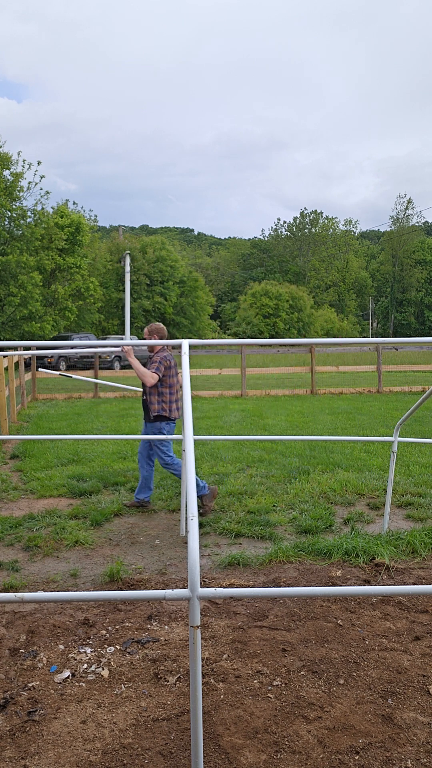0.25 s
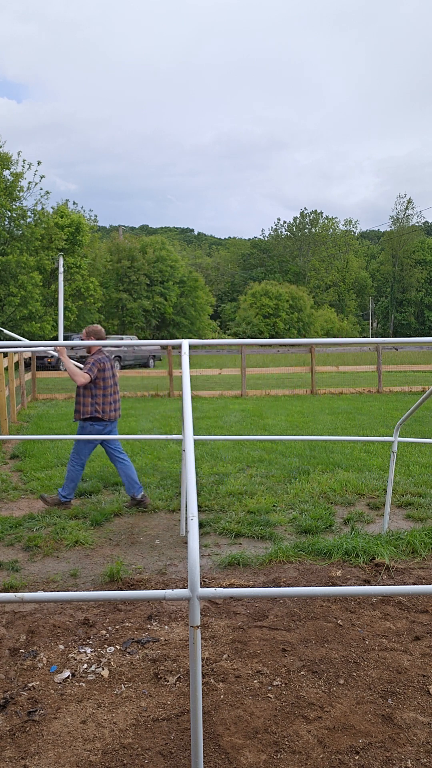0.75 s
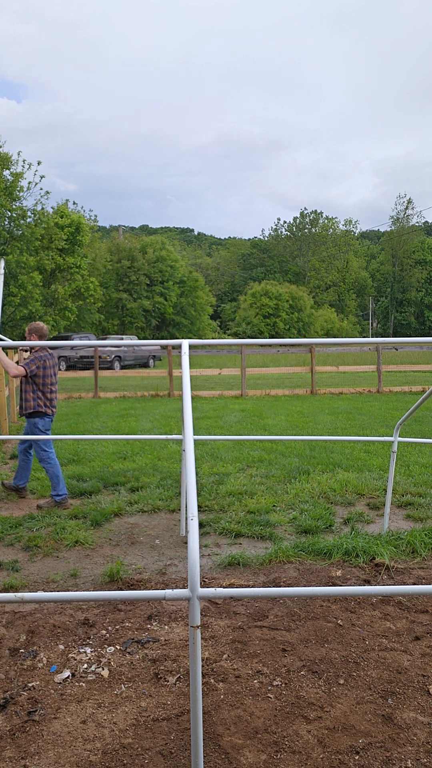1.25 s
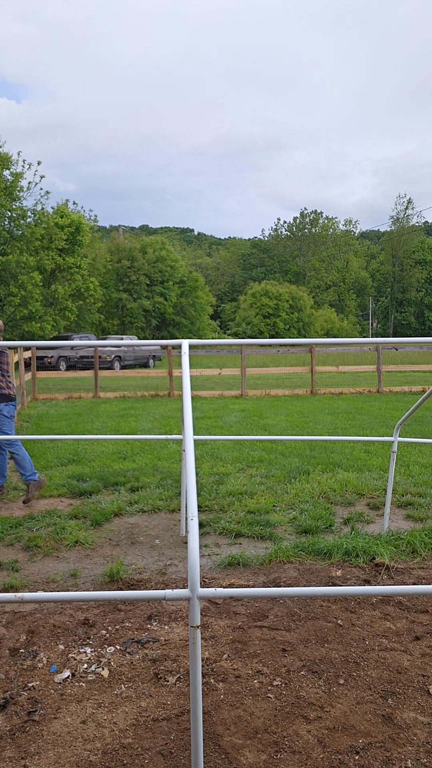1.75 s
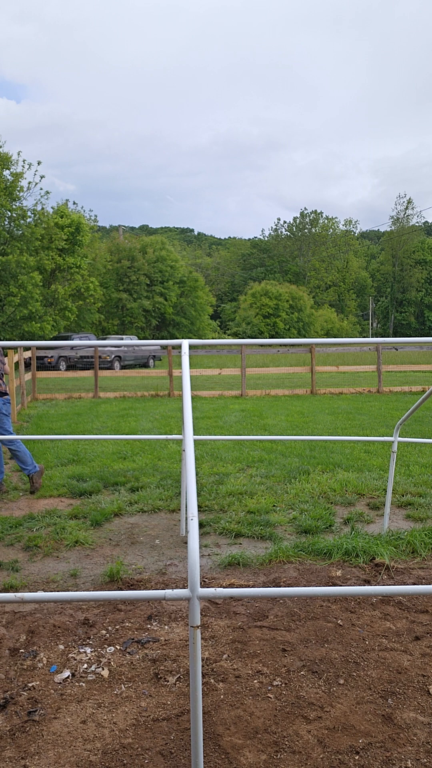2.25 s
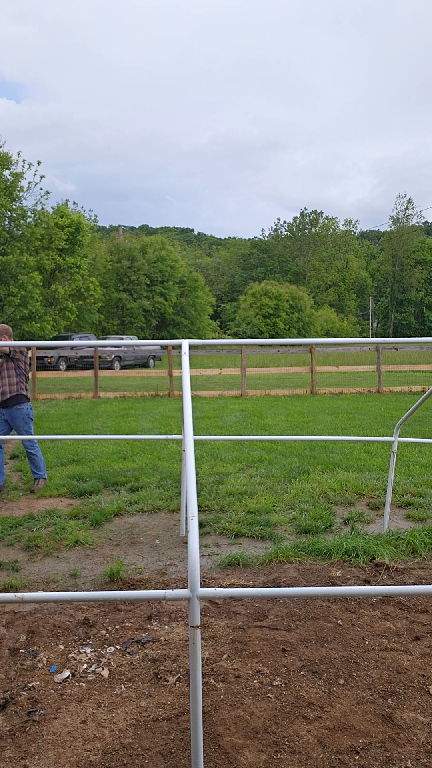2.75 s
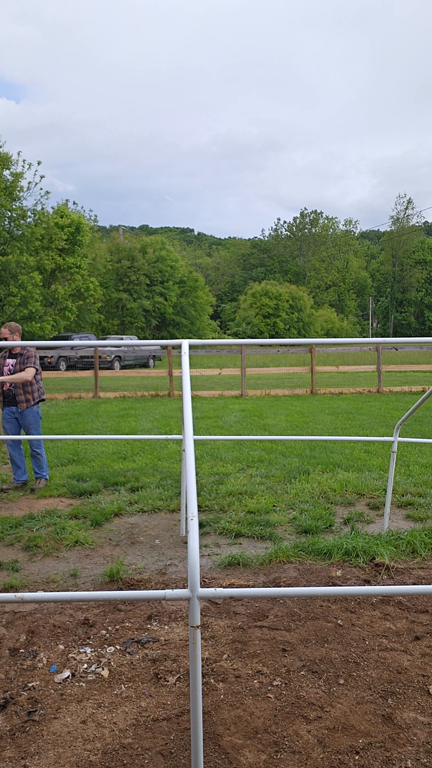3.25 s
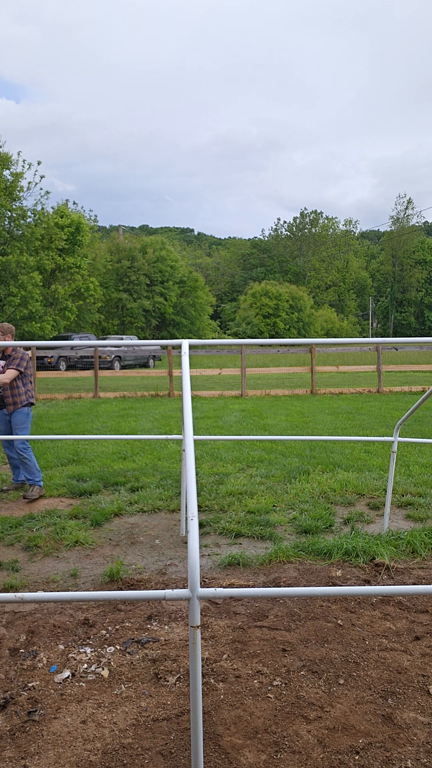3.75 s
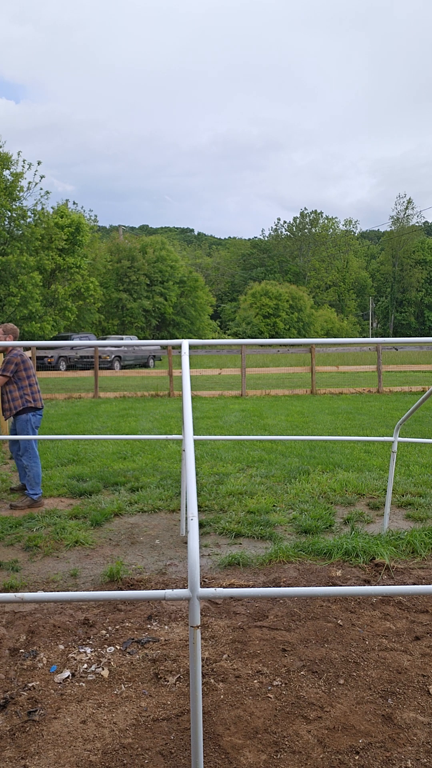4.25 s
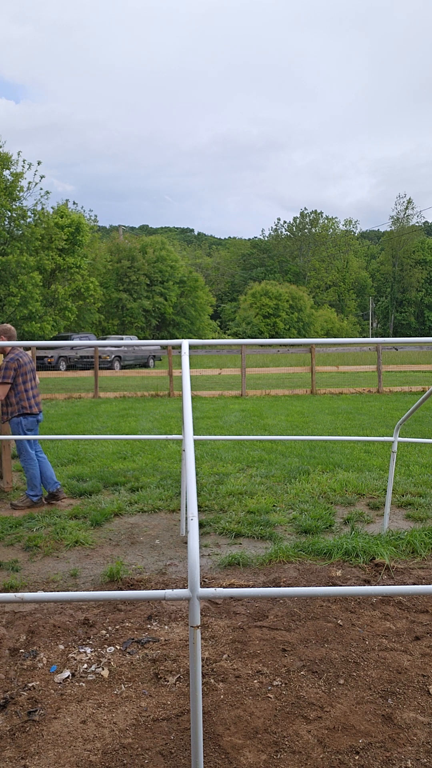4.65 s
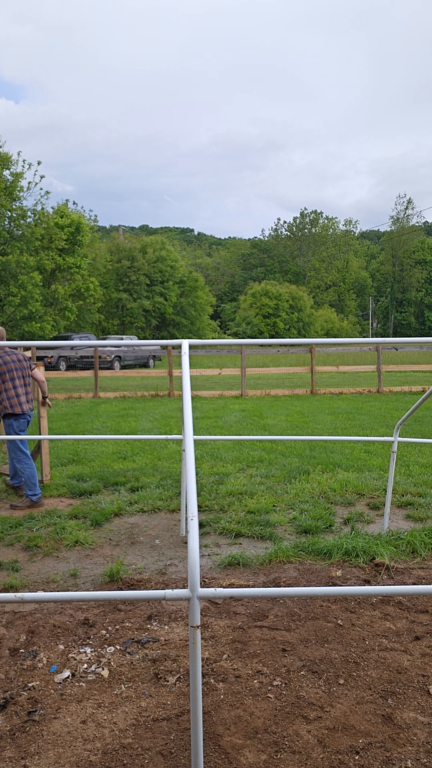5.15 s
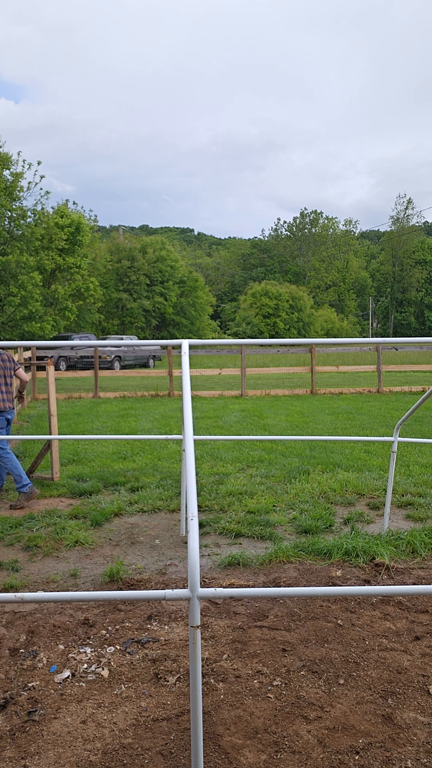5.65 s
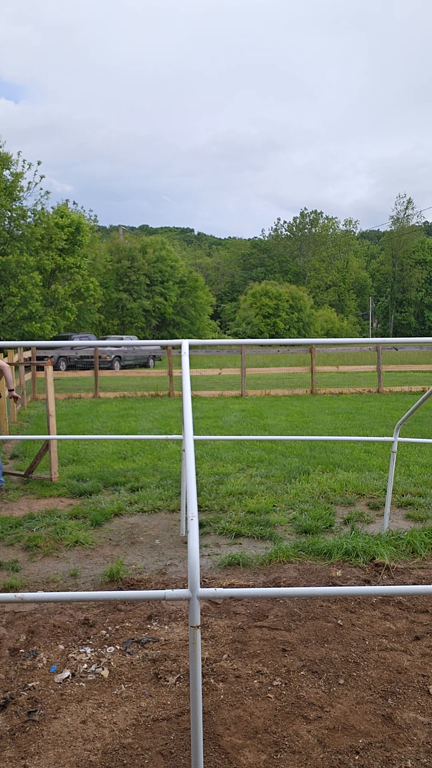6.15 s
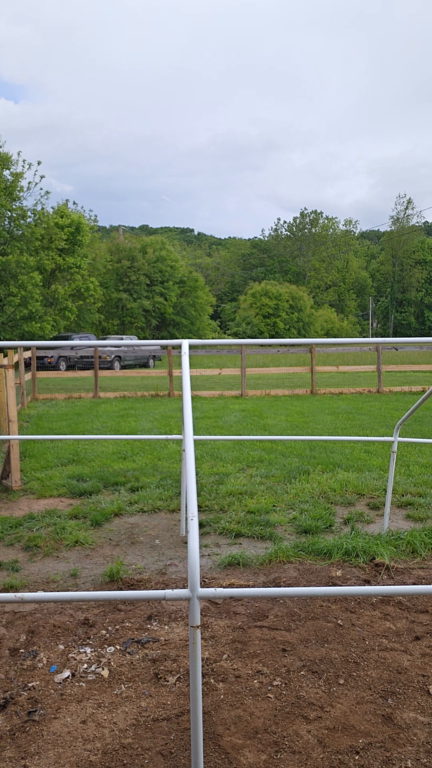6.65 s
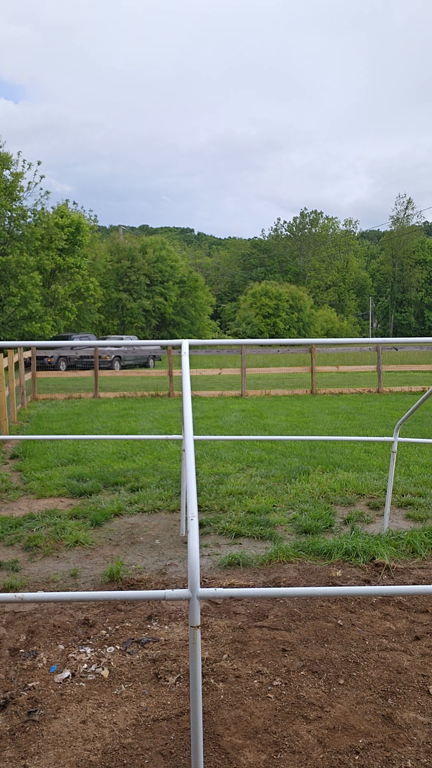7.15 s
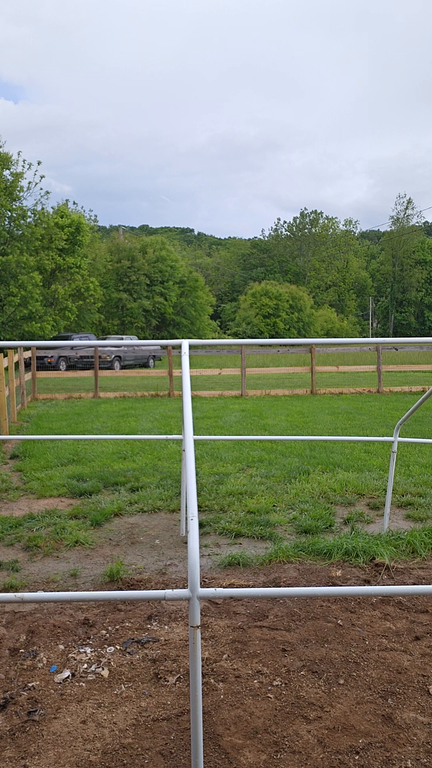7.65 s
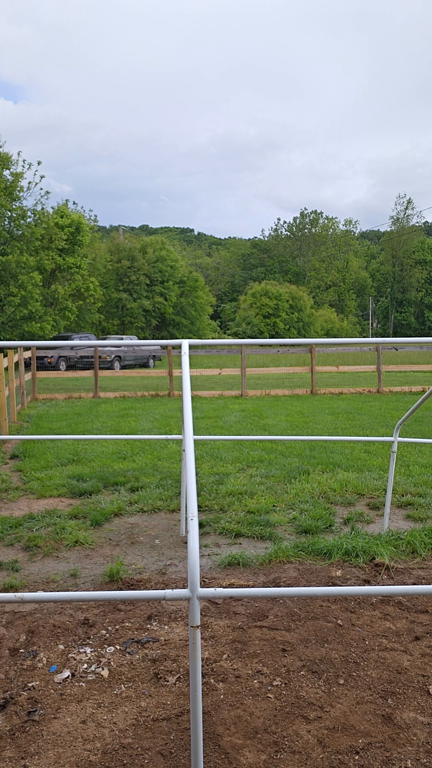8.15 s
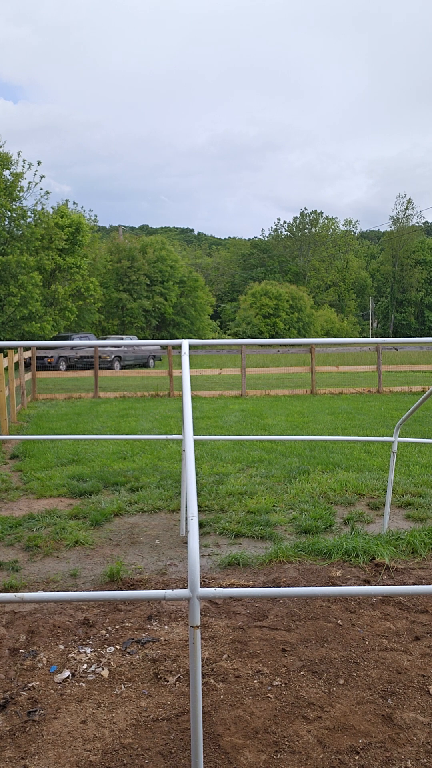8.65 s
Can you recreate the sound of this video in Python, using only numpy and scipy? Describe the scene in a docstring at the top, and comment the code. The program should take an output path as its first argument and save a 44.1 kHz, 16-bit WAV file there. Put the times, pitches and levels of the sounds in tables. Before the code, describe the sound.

Metal poles clank and clatter onto a pile in a quiet yard, then a wooden stand knocks hard against metal with a low boom.

```python
"""Tent poles and a wooden stand in a yard

A man carries metal tent poles across a grassy yard and drops them on a pile, where they clatter and settle;
he then shifts a wooden stand and knocks it down against the metal, which clinks and booms like a large panel.
Blows are shaped noise plus decaying sines, the boom is wobbling low sines, and scuffs are grainy noise.
Behind: air as drifting noise, a distant motor as narrow noise lines, a faint bird as gliding sines with echo."""
import sys
import numpy as np
from scipy import signal
from scipy.fft import rfft, irfft, next_fast_len
from scipy.io import wavfile
from scipy.ndimage import uniform_filter1d

SR = 44100
rng = np.random.default_rng(int(sys.argv[2]) if len(sys.argv) > 2 else 0)


def transcribe(u):
    """Save the signal u as a 16-bit wav file named by the first command-line argument.

    u: samples, shape (n,) or (channels, n), limited to [-1, 1]; the rate is SR.
    q: integer samples, one column per channel.
    """
    v = np.clip(np.atleast_2d(u).T, -1, 1)
    q = np.round(v * 32767).astype(np.int16)
    wavfile.write(sys.argv[1], SR, q)


N = 392798


def amp(db):
    """Decibels to gain."""
    return 10 ** (np.asarray(db) / 20)


def evened(x):
    """Scales to rms 1."""
    return x / np.sqrt(np.mean(x ** 2) + 1e-20)


def read(points, hz):
    """Reads a spectrum on a log-frequency axis."""
    f, value = np.transpose(points)
    return np.interp(np.log(hz + 1), np.log(f + 1), value)


def swell(points):
    """A level curve as a gain for every sample."""
    return amp(np.interp(np.arange(N) / SR, *np.transpose(points)))


def add(mix, s, sound):
    """Adds a stereo sound at time s."""
    part = mix[:, max(round(s * SR), 0):][:, :sound.shape[1]]
    part += sound[:, :part.shape[1]]


def envelope(t, rise, t60):
    """A straight rise, then an exponential decay."""
    return np.minimum(t / rise, 1) * amp(-60 * np.maximum(t - rise, 0) / t60)


def pair(z, likeness):
    """Makes two unrelated spectra partly alike, as left and right."""
    c = np.clip(likeness, -1, 1)
    return np.array([z[0], c * z[0] + np.sqrt(1 - c ** 2) * z[1]])


# Relative colour of the air. Each row: frequency in Hz, level in dB per Hz.
AIR_COLOUR = [(20, -27), (43, -9.5), (81, -5.5), (110, -1), (142, -12), (204, -11), (280, -16.5),
              (540, -20), (1330, -16), (1760, -19.5), (2750, -19.5), (3400, -25.5), (4900, -26),
              (5900, -33), (9000, -34.5), (13900, -32), (16000, -42)]
# Slow level of the air. Each row: time in seconds, gain in dB.
AIR_LEVEL = [(0, -0.5), (2.1, -1), (3, -5.5), (4.1, 0), (5, -1.5), (8.9, -0.74)]
# How alike left and right are. Each row: frequency in Hz, likeness (1 = the same).
AIR_LIKENESS = [(60, 0.86), (130, 0.98), (290, 0.98), (640, 0.79), (1300, 0.44), (2200, 0.12),
                (4000, 0.056), (15000, 0.083)]
AIR_DB = -48  # rms before the swell


def air(patch_db=1.84, flicker_db=2.0, lead_s=0.00028):
    """Far traffic and leaves: noise with drifting patches and a treble that flickers."""
    frames, hz = N // 256 + 5, np.fft.rfftfreq(1024, 1 / SR)
    a, b, c, d, patches = rng.standard_normal((5, frames, len(hz)))
    patches = uniform_filter1d(patches, size=14, axis=0)  # smooth in time
    patches = evened(uniform_filter1d(patches, size=12, axis=1))  # smooth in frequency
    flicker = evened(uniform_filter1d(rng.standard_normal(frames), size=5))
    treble_flicker = flicker[:, None] * hz / (hz + 4000)
    tone_db = read(AIR_COLOUR, hz) + patch_db * patches + flicker_db * treble_flicker
    spectra = pair([a + 1j * b, c + 1j * d], read(AIR_LIKENESS, hz)) * amp(tone_db)
    spectra[0] *= np.exp(2j * np.pi * hz * lead_s)  # the far sound reaches the left side first
    noise = signal.istft(spectra.swapaxes(1, 2), nperseg=1024, noverlap=768)[1][:, :N]
    noise = signal.sosfilt(signal.butter(2, 42, "high", fs=SR, output="sos"), noise)
    return amp(AIR_DB) * evened(noise) * swell(AIR_LEVEL)


# Low motor lines. Each row: centre in Hz, width in Hz, level in dB before the swell.
DRONE_LINES = [(56.3, 3.1, -61), (111.6, 16.6, -55.5), (116.6, 5.3, -61.5)]
# Slow level of the motor. Each row: time in seconds, gain in dB.
DRONE_LEVEL = [(0, 6), (.7, -1.5), (3, -2.5), (4.3, 4), (6, -2.5), (8.9, -2)]


def drone():
    """A distant motor: noise narrowed to low lines, which waver by themselves."""
    size = next_fast_len(N, True)
    hz = np.fft.rfftfreq(size, 1 / SR)
    lines = np.zeros(size)
    for centre_hz, width_hz, db in DRONE_LINES:
        resonance = 1 / (1 + (2 * (hz - centre_hz) / width_hz) ** 2)
        lines += amp(db) * evened(irfft(rfft(rng.standard_normal(size)) * resonance, size))
    return lines[:N] * swell(DRONE_LEVEL)


# Bird notes, slurred down from the top pitch or lifted slightly up to it.
# Each row: start in seconds, top pitch in Hz before waver, level in dB before the direct and echo gains,
# direction (+1 up, -1 down).
BIRD_NOTES = [(5.92, 2870, -58, -1), (6.386, 3460, -56, 1), (6.52, 2825, -54, -1), (6.98, 2910, -58, -1),
              (7.516, 3670, -54, 1), (7.61, 3070, -55.5, -1), (8.685, 3650, -51.5, 1),
              (8.72, 2810, -57, -1)]
UP_NOTE_S, UP_HZ_PER_S, DOWN_NOTE_S, DOWN_HZ_PER_S = 0.073, 4100, 0.12, 6000


def bird(waver=0.022, echo_t60=0.63, direct_db=-6, echo_db=-8):
    """Faint gliding whistles, smeared by the trees: sines plus a decaying noise echo."""
    notes = np.zeros((2, N))
    for s, top_hz, db, way in BIRD_NOTES:
        if way > 0:
            length_s = UP_NOTE_S
            start_hz, end_hz = top_hz - UP_HZ_PER_S * length_s, top_hz
        else:
            length_s = DOWN_NOTE_S
            start_hz, end_hz = top_hz, top_hz - DOWN_HZ_PER_S * length_s
        size = int(length_s * SR)
        wander = evened(uniform_filter1d(rng.standard_normal(SR), 200))[:size]
        hz = np.linspace(start_hz, end_hz, size) * (1 + waver * wander)
        whistle = np.hanning(size) * np.sin(2 * np.pi * np.cumsum(hz) / SR)
        add(notes, s, np.tile(amp(db) * evened(whistle), (2, 1)))
    trees = rng.standard_normal((2, SR)) * envelope(np.arange(SR) / SR, 0.0058, echo_t60)
    echo = signal.fftconvolve(notes, trees / np.linalg.norm(trees[0]), axes=1)[:, :N]
    return amp(direct_db) * notes + amp(echo_db) * echo


# Stretches in which he walks and handles things. Each row: start in seconds, end in seconds.
BUSY_STRETCHES = [(0, 1.8), (3.4, 4.3)]
RUSTLES_PER_S, RUSTLE_DB, RUSTLE_SPREAD_DB = 3, -55, 5.5
RUSTLE_T60, RUSTLE_TREBLE_DB = 0.15, 3  # seconds; dB at 8 kHz


def rustles():
    """Faint scuffs scattered through the busy stretches, one at a random moment in each time slot."""
    rows = []
    for start, end in BUSY_STRETCHES:
        for slot in np.arange(start, end, 1 / RUSTLES_PER_S):
            s = slot + rng.random() / RUSTLES_PER_S
            db = RUSTLE_DB + RUSTLE_SPREAD_DB * rng.standard_normal()
            rows.append((s, db, RUSTLE_T60, RUSTLE_TREBLE_DB))
    return rows


# Scuffs in grass and small handling ticks.
# Each row: start in seconds, level in dB before the envelope, decay t60 in seconds, treble tilt in dB at 8 kHz.
GRASS_SCUFFS = [(.06, -48, 0.63, 5), (.326, -49.5, 0.24, 7), (.555, -53, 0.4, 17), (.816, -46.5, 0.13, 3),
                (1.332, -47.5, 0.06, 5), (4.067, -44, 0.096, -6), (4.2, -49.5, .5, -3),
                (5.819, -45.5, .6, -6), (8.485, -49, 0.11, 8)]
# Relative colour of the scuffs. Each row: frequency in Hz, level in dB per Hz.
GRASS_COLOUR = [(100, -13), (500, 16), (4000, 13.5), (7000, 7.5), (14000, 9.5), (16000, -17)]
SCUFF_RISE_SHARE = 0.024  # rise time as a share of the decay time


def scuffs(grain_db=4):
    """Short bursts of crisp grains: noise with random spikes in level, coloured and decaying."""
    t, hz, out = np.arange(SR) / SR, np.fft.rfftfreq(SR, 1 / SR), np.zeros((2, N))
    for s, db, t60, treble_db in list(GRASS_SCUFFS) + rustles():
        spikes = amp(grain_db * np.minimum(rng.exponential(1, SR), 5))
        grains = rng.standard_normal((2, SR)) * spikes
        tone_db = read(GRASS_COLOUR, hz) + treble_db * hz / 8000
        burst = evened(irfft(rfft(grains) * amp(tone_db)))
        add(out, s, amp(db) * burst * envelope(t, SCUFF_RISE_SHARE * t60, t60))
    return out


MEDIUM_BLOW_DB = -22
RISE_HALVES_DB = 22  # a blow this much harder rises twice as fast


def struck(rows, rise_s, crash_t60, ring_db, decay_per_db, decay_per_bass_db, ring_per_db):
    """Force sets each blow's rise and ring; force and bass stretch (+) or shorten (-) its decay."""
    s, db, bass_db, treble_db = np.transpose(rows)
    force = db - MEDIUM_BLOW_DB
    rise = rise_s * 0.5 ** (force / RISE_HALVES_DB)
    t60 = crash_t60 * np.exp(decay_per_db * force + decay_per_bass_db * bass_db)
    return np.transpose([s, db, bass_db, treble_db, rise, t60, ring_db + ring_per_db * force])


def clank(blows, modes, colour, tail_db, tail_t60, grit_db, body_db,
          likeness=0.32, lag_s=0.0002316, spacing_hz=28, width_hz=45):
    """Each blow sets off a gritty crash of chattering contacts, a ring of crowded weak modes and a few clear ones."""
    t, hz, out = np.arange(SR) / SR, np.fft.rfftfreq(SR, 1 / SR), np.zeros((2, N))
    delay = np.exp(2j * np.pi * hz * np.array([[-lag_s], [0]]))  # the sound reaches the right side first
    alike = likeness + (1 - likeness) / (1 + (hz / 500) ** 2)  # long waves reach both sides alike
    crowd = (rng.random(len(hz)) < 1 / spacing_hz) * amp(read(colour, hz))
    crowd = crowd / np.hypot(1, hz / 6500) * hz / np.hypot(hz, 400)  # softer at both ends
    # the chatter passes through the same body, so it gathers round the modes
    peaks = np.max([1 / (1 + (2 * (hz - f) / (width_hz + f / 100)) ** 2) for f, _, _ in modes], axis=0)
    unevenness_db = 2 * evened(uniform_filter1d(rng.standard_normal(len(hz)), size=70))
    body_colour_db = read(colour, hz) + body_db * peaks + unevenness_db
    for s, db, bass_db, treble_db, rise, t60, ring_db in blows:
        bass_tilt_db = bass_db / (1 + (hz / 1000) ** 4)
        treble_tilt_db = treble_db / (1 + (6000 / (hz + 1)) ** 6)
        tone = amp(body_colour_db + bass_tilt_db + treble_tilt_db)
        # the chatter jumps in level every 40 samples
        grit = amp(grit_db * np.repeat(rng.standard_normal(SR // 40 + 1), 40)[:SR].clip(-2, 2))
        chatter = rng.standard_normal((2, SR)) * grit
        crash = evened(irfft(pair(rfft(chatter), alike) * delay * tone))
        shimmer = evened(irfft(pair(rfft(rng.standard_normal((2, SR))), alike) * delay * crowd))
        ring = np.zeros((2, SR))
        for f, mode_db, mode_t60 in modes:
            # each blow draws every mode's phase, strength, left-right skew and slight detuning at random,
            # so no two ring alike
            turn, size, skew, detune = rng.standard_normal(4)
            side_turns = np.array([[0.1 * skew - f * lag_s], [0]])
            phase = 2 * np.pi * (f * (1 + 0.00274 * detune) * t + turn + side_turns)
            ring += amp(mode_db + 2 * size) * envelope(t, rise, mode_t60) * np.sin(phase)
        body = crash * envelope(t, rise, t60)
        body += amp(tail_db) * shimmer * envelope(t, 0.012, tail_t60)
        add(out, s, amp(db) * (body + amp(ring_db) * ring / np.sqrt(len(modes) / 2)))
    return out


# Modes of the booming panel.
# Each row: frequency in Hz, level in dB before the wobble, rise in seconds, decay t60 in seconds.
PANEL_MODES = [(54, -34, .04, 1.94), (69, -43, 0.071, 0.5), (84, -26.5, 0.11, 1.07),
               (93.5, -42.5, 0.066, 2.5), (107, -30, 0.015, 0.65), (151, -43, 0.025, 1.1),
               (187.5, -50, 0.064, 3.1), (216.5, -50, .05, 2.8), (236, -44.5, 0.046, 0.51),
               (286, -43.5, .01, 0.18)]
BOOM_S = 7.262


def boom(flutter=0.19):
    """A large loose panel takes up the knock slowly and wobbles as it dies."""
    t, out = np.arange(2 * SR) / SR, np.zeros((2, N))
    for hz, db, rise, t60 in PANEL_MODES:
        wobble = evened(irfft(rfft(rng.standard_normal(len(t)))[:40], len(t)))  # noise below 20 Hz
        tone = envelope(t, rise, t60) * (1 + flutter * wobble) * np.sin(2 * np.pi * hz * t)
        add(out, BOOM_S, np.tile(amp(db) * tone, (2, 1)))
    return out


# Blows of the stand. Each row: start in seconds, force as level in dB, bass tilt in dB, treble tilt in dB.
STAND_HITS = [(4.634, -26, -2.5, 3), (7.218, -17.5, 1, 9.5), (7.234, -13.5, 1.5, 0.5), (7.244, -16, 3, 4.5),
              (7.265, -25, 11, 9), (7.288, -19, -2, 1.5), (7.72, -40, -6, -4)]
# Clear modes. Each row: frequency in Hz before detuning, relative level in dB, decay t60 in seconds.
STAND_RING = [(555, -10, .22), (1028, 2, .22), (1140, 0, .25), (1600, 1, .25), (1810, 0, .22),
              (1884, -4, .24), (2272, -7, .28), (3280, -9, .15), (4620, -9, .22), (5480, -10, .18),
              (12830, -2, .22), (13400, -5, .2), (13698, -3, .2), (13757, -3, .28)]
# Relative colour of the crash. Each row: frequency in Hz, level in dB per Hz.
STAND_CRASH = [(80, -14), (400, -9), (700, -5.5), (1050, 4), (1800, 3), (2600, 0), (5200, -3), (7000, -8),
               (10500, -7.5), (13300, -5), (16000, -11.5)]


def stand():
    """The wooden stand shifts and knocks the metal; harder blows crash longer and ring more."""
    blows = struck(STAND_HITS, rise_s=0.0028, crash_t60=0.11, ring_db=-11.5,
                   decay_per_db=0.0332, decay_per_bass_db=0.11, ring_per_db=0.6)
    return clank(blows, STAND_RING, STAND_CRASH, tail_db=-23.5, tail_t60=0.72,
                 grit_db=4.0, body_db=7, spacing_hz=12)


# Blows on the carried pole. Each row: start in seconds, force as level in dB, bass tilt in dB, treble tilt in dB.
POLE_HITS = [(1.905, -18.5, -1.5, 1), (1.921, -23, -4, -13), (1.972, -38, 6, -7)]
# Clear modes. Each row: frequency in Hz before detuning, relative level in dB, decay t60 in seconds.
POLE_RING = [(458, -13, .6), (883, -4, .35), (1163, -12, .35), (1640, -4, .5), (2010, -3, .3),
             (2396, -2, .27), (2760, 0, .3), (3214, -4, .24), (3800, -2, .22), (3910, -4, .2),
             (4727, -9, .35), (4925, -10, .18)]
# Relative colour of the crash. Each row: frequency in Hz, level in dB per Hz.
POLE_CRASH = [(80, -39), (220, -8.5), (600, -1.5), (1100, -4.5), (1700, 1.5), (4300, -0.5), (6000, -5),
              (11500, -0.5), (16000, -8)]


def pole():
    """The carried pole is struck; harder blows crash shorter and ring more."""
    blows = struck(POLE_HITS, rise_s=0.0016, crash_t60=0.2, ring_db=-6.5,
                   decay_per_db=-0.12, decay_per_bass_db=-0.12, ring_per_db=0.4)
    return clank(blows, POLE_RING, POLE_CRASH, tail_db=-23.0, tail_t60=0.46, grit_db=1.0, body_db=7.5)


# Blows on the pile. Each row: start in seconds, force as level in dB, bass tilt in dB, treble tilt in dB.
PILE_HITS = [(2.183, -32, -1, -4), (2.198, -18.5, -4, -6.5), (2.215, -23, -15, 6), (2.2345, -10, 7, 6),
             (2.241, -13.5, 1.5, 5), (2.282, -15, -3, 3), (2.294, -34, 23, 1), (2.379, -39.5, -4, -8),
             (2.492, -27.5, 3.5, -1.5), (2.525, -35, 8, 0), (2.563, -29, 3.5, 0), (2.606, -24, -5, 0),
             (2.62, -25, -1, -4), (2.704, -31.5, -1.5, -4.5), (2.781, -36, 6, 3), (2.834, -42, 10, 5),
             (2.945, -39.5, 7.5, -6)]
# Clear modes. Each row: frequency in Hz before detuning, relative level in dB, decay t60 in seconds.
PILE_RING = [(301, -7, .35), (533, -14, .5), (585, -5, .3), (880, -6, .5), (914, 2, .28), (1168, -10, .8),
             (1597, -8, .55), (1990, -9, .55), (2690, -8, .35), (3290, -12, .45), (3490, -15, .6),
             (3800, -7, .35), (4172, -13, .6), (4264, -9, .6), (4650, 0, .3), (4978, -5, .35),
             (5227, -12, .55)]
# Relative colour of the crash. Each row: frequency in Hz, level in dB per Hz.
PILE_CRASH = [(60, -6.5), (230, 0.5), (550, 2), (900, 4.5), (1400, 2.5), (3100, 1), (4700, 1.5), (6300, 0),
              (9000, -5.5), (12500, -0.5), (16000, -11)]


def pile():
    """Poles clatter and settle on the pile; harder blows crash shorter and ring slightly less."""
    blows = struck(PILE_HITS, rise_s=0.0027, crash_t60=0.24, ring_db=-6.0,
                   decay_per_db=-0.0262, decay_per_bass_db=-0.0775, ring_per_db=-0.11)
    return clank(blows, PILE_RING, PILE_CRASH, tail_db=-21.5, tail_t60=0.76, grit_db=1.5, body_db=4.0)


def scene():
    """Poles, pile and stand over the quiet yard."""
    background = air() + drone() + bird()
    return background + scuffs() + boom() + stand() + pole() + pile()


EDGE_HZ = 16100


def record(dry):
    """Full-scale clipping and the band limit."""
    lowpass = signal.firwin(511, EDGE_HZ, window=("kaiser", 9), fs=SR)
    return signal.oaconvolve(np.clip(dry, -1, 1), lowpass[None], "same")


dry = scene()
out = record(dry)
transcribe(out)
```